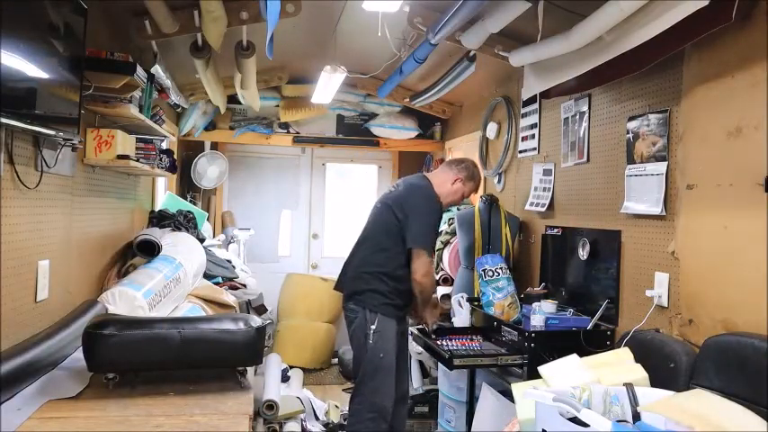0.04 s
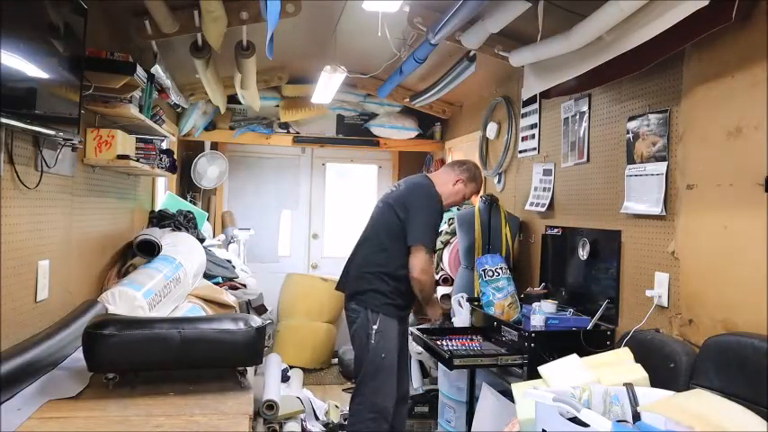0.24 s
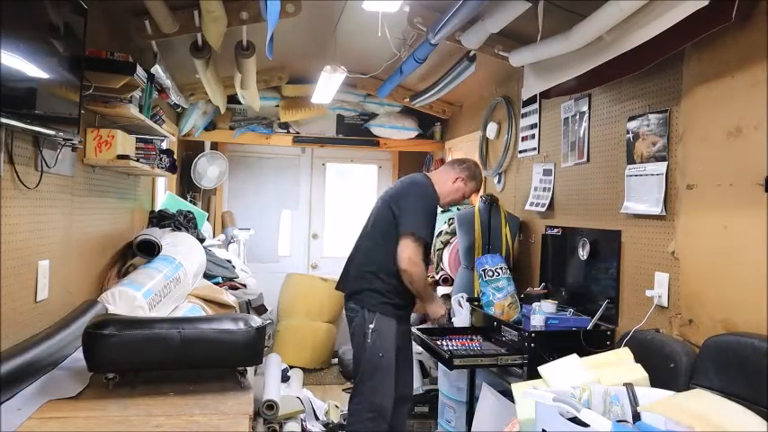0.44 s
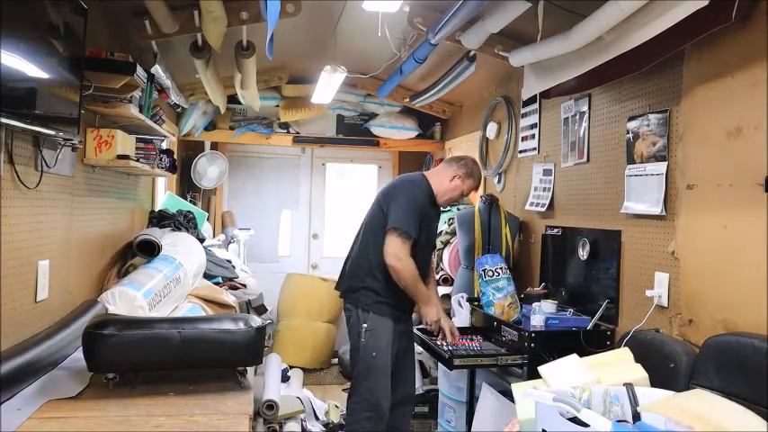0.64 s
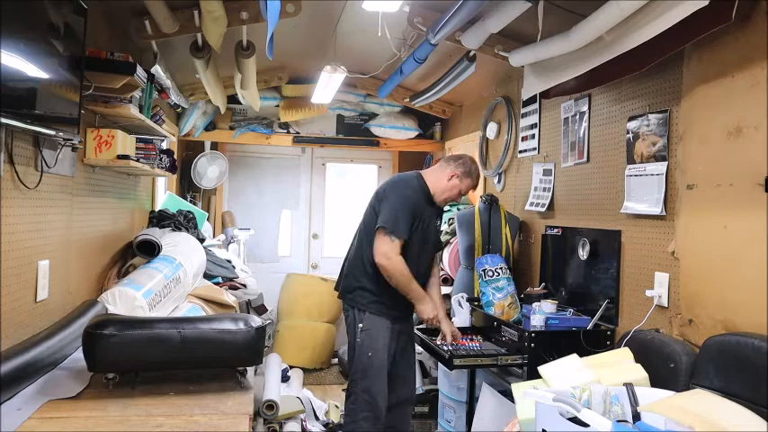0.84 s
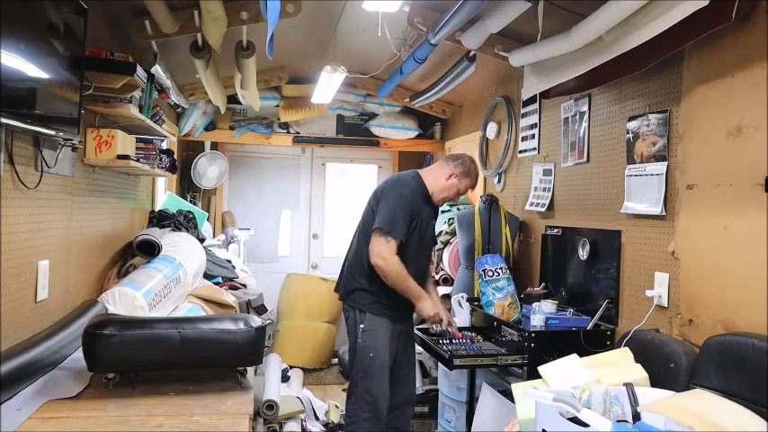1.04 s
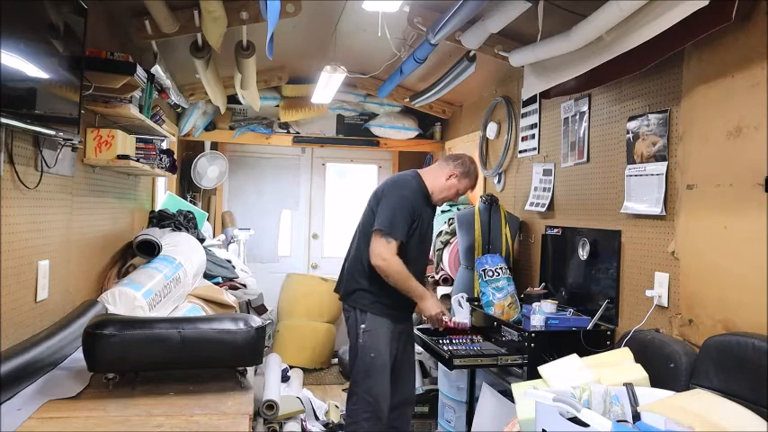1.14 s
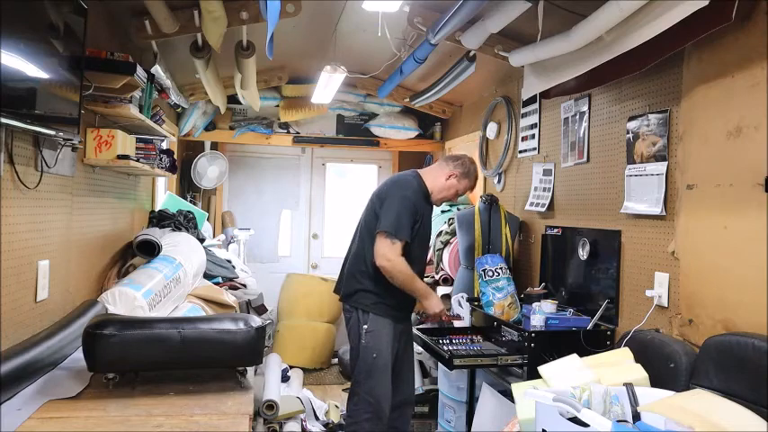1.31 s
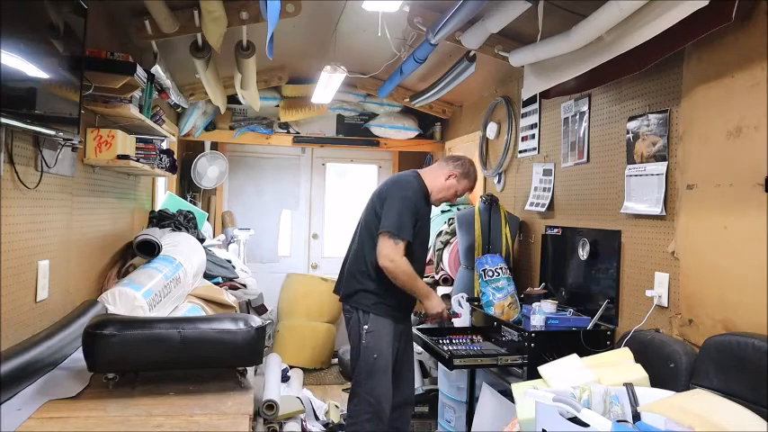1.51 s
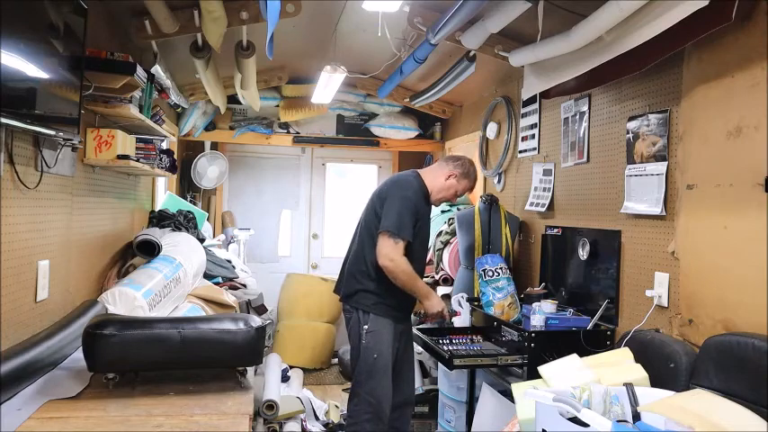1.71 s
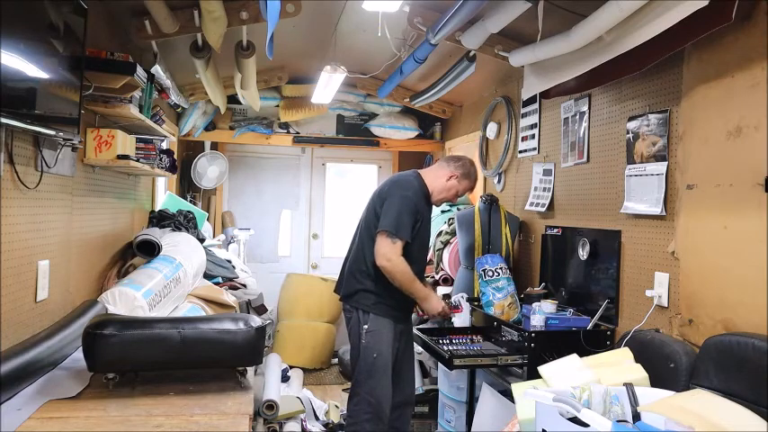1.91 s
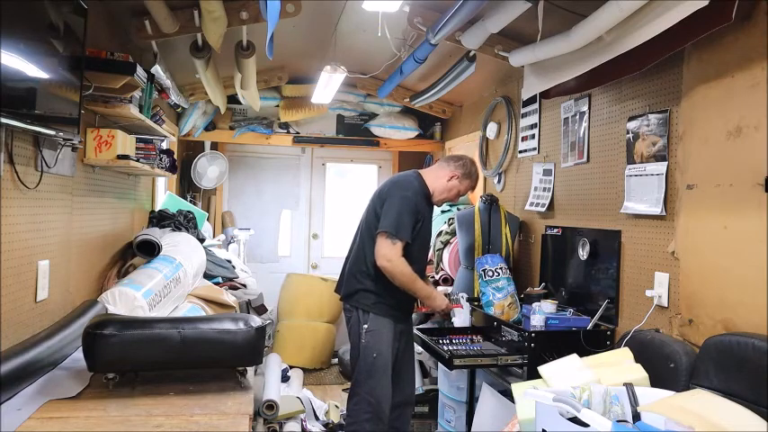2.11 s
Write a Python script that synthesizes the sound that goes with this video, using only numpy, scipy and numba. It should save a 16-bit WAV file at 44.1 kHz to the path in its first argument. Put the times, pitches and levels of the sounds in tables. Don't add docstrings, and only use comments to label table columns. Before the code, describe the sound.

A heavy metal tool crashes into a steel drawer, then small tools click and clink

```python
import sys
import numpy as np
from scipy import signal
from scipy.fft import rfft, irfft
from scipy.io import wavfile
from scipy.ndimage import uniform_filter1d
from numba import njit

SR = 44100
rng = np.random.default_rng(int(sys.argv[2]) if len(sys.argv) > 2 else 0)


def to_linear_factor(level_db):
    exponent = np.asarray(level_db, float) / 20
    return 10 ** exponent


def wav_out(sig):
    wavfile.write(sys.argv[1], SR, np.round(np.clip(np.atleast_2d(sig).T, -1, 1) * 32767).astype(np.int16))


N = 94815

# pitch_hz, level_db (per Hz)
FLOOR_COLOUR = [(12, -51), (20, -4), (120, -6), (319, -14), (698, -14.5), (1120, -20), (2750, -25),
                (13500, -31.5), (16000, -34)]
# start_s, level_db (peak), pitch_hz
SOFT_THUDS = [(0.174, -37, 94), (0.302, -34, 59), (.34, -34, 35), (.4, -39, 40), (.46, -39, 45.5),
              (0.52, -45, 120), (.548, -46, 132), (.559, -39, 123), (.571, -39, 131), (.591, -39, 74.4),
              (.611, -38, 70.5), (.826, -39, 118), (.858, -36, 96), (1.216, -39, 120), (1.314, -41.5, 112),
              (1.346, -41.5, 57.7), (1.479, -37.5, 90), (1.701, -38, 84.6), (1.714, -36.5, 130),
              (1.729, -42, 140), (1.834, -41.5, 78), (1.896, -35.5, 111)]
# start_s, level_db (peak), brightness_db (per octave)
DRAWER_BLOWS = [(.178, -45, 5.5), (0.2105, -11, 3.1), (.2115, -3, 3), (.2145, -7, 2.5), (.219, -10.5, 0),
                (.226, -5.5, 2.3), (.244, -7.5, 0.5), (0.263, -10.5, 9.5), (0.27, -13, 3.5),
                (.289, -13, 2.5), (.296, -4.5, 0), (.3095, -0.5, 4.4), (0.314, -3, 1.5), (.323, -3.5, 2.5),
                (0.328, -12.5, -3.5), (.345, -7, 2.3), (.354, -10, 4), (0.687, -42, 0), (.695, -41, 1.5)]
# pitch_hz, level_db (per Hz)
DRAWER_COLOUR = [(60, -35.5), (200, -11), (420, 0), (1100, 3), (2770, -4.5), (8800, -25.5), (11000, -40.5),
                 (16000, -56)]
# start_s, pitch_hz, level_db, fade_s (time to fall 60 dB)
SHEET_RINGS = [(.211, 425.5, -14.5, .06), (.213, 203, -29, 0.086), (.219, 1102, -25.5, 0.13),
               (.222, 701, -25, 0.072), (.263, 6240, -21.5, 0.023), (0.261, 8220, -29.5, .06),
               (.275, 149, -28.5, 0.084), (0.293, 2456, -18.5, 0.05), (.310, 773, -16, 0.045),
               (0.313, 1150, -22, .12), (.33, 960, -24, .2), (0.312, 1440, -19.5, 0.036),
               (.316, 371, -21.5, 0.052), (.318, 520, -19, 0.027), (0.319, 2753, -17, 0.032),
               (0.689, 1110, -40, 0.019)]
# start_s, level_db (peak), brightness_db (per octave)
TOOL_CLICKS = [(1.018, -42.5, -1), (1.038, -43, 5.5), (1.2, -40, -5), (1.204, -43.5, -2.1),
               (1.2547, -26, -5), (1.2568, -18.5, 1.7), (1.2644, -24.5, -2.2), (1.282, -42, 4),
               (1.3818, -21, -0.5), (1.3847, -24, -0.8), (1.395, -47, 6), (1.4204, -22.5, 4.7),
               (1.4248, -20.5, 0.5), (1.445, -25.5, 1), (1.4873, -31, -9.5), (1.4911, -20.5, -4),
               (1.4963, -14.5, 0), (1.510, -17, 1), (1.516, -29, -3), (1.532, -42, 13), (1.784, -27, 9.5),
               (1.7872, -31, 3.1), (1.807, -42, 5), (1.944, -28, 0), (1.949, -35, 6.5), (2.002, -44.5, -1)]
# pitch_hz, level_db (per Hz)
TOOL_COLOUR = [(300, -46.5), (1500, -18.5), (3000, -9), (6000, -0.5), (8800, -9.5), (10500, -29),
               (12500, -31), (16000, -48)]
# start_s, pitch_hz, level_db, fade_s (time to fall 60 dB)
TOOL_RINGS = [(1.255, 11550, -47, 0.11), (1.256, 13500, -48, .06), (1.257, 14900, -49, .09),
              (1.256, 6020, -37.5, 0.038), (1.282, 11700, -53, 0.068), (1.384, 14700, -48, 0.081),
              (1.384, 13500, -48, 0.034), (1.384, 11400, -48, 0.062), (1.428, 11800, -53, 0.065),
              (1.428, 14700, -56, .08), (1.496, 11900, -51, .05), (1.496, 13500, -48, .06),
              (1.511, 11500, -45, .07), (1.511, 13700, -46, .06), (1.787, 9000, -37, .01),
              (1.785, 5870, -55, 0.028), (1.946, 3720, -50, .02), (1.948, 7070, -50, .02)]
# start_s, length_s, pitch_hz, level_db
TINY_CREAK = (2.095, .035, 2850, -57)
# pitch_hz, fade_s (time to fall 60 dB)
ECHO_FADE = [(100, 0.48), (400, 0.31), (900, 0.24), (2000, 0.13), (6000, .22), (12000, 0.11)]
NEAR_DELAYS = (.0007, .0019)


def at_log(hz, table):
    table = np.array(table, float)
    return np.interp(np.log(np.maximum(hz, 1)), np.log(table[:, 0]), table[:, 1])


def colour(x, table, tilt_db=0):
    hz = np.arange(2049) * SR / 4096
    tilt = tilt_db * np.log2(np.maximum(hz, 50) / 1000)
    log_gain = (at_log(hz, table) + tilt) * np.log(10) / 20
    ceps = irfft(log_gain)
    ceps[1:2048] *= 2
    ceps[2049:] = 0
    response = irfft(np.exp(rfft(ceps)))
    return signal.fftconvolve(x, response)[:len(x)]


def add(out, start_s, x):
    i = int(start_s * SR)
    out[i:i + len(x)] += x[:N - i]


def walk(rate_hz):
    k = int(SR / rate_hz)
    steps = np.repeat(rng.standard_normal(N // k + 1), k)
    return 1.36 * uniform_filter1d(uniform_filter1d(steps, k), k)[:N]


def floor():
    noise = colour(rng.standard_normal(N), FLOOR_COLOUR)
    hum = signal.sosfilt(signal.butter(2, 200, fs=SR, output="sos"), noise)
    hiss = noise - hum
    x = hiss * to_linear_factor(0.37 * walk(2.22)) + hum * to_linear_factor(2.5 * walk(13))
    return to_linear_factor(-50.5) * x / np.std(x)


def thuds():
    out = np.zeros(N)
    cycles = 1.25
    for start_s, level_db, pitch_hz in SOFT_THUDS:
        turns = np.arange(int(cycles / pitch_hz * SR)) / SR * pitch_hz
        swing = np.sin(2 * np.pi * turns) * np.sin(np.pi * turns / cycles)
        add(out, start_s, -to_linear_factor(level_db) * swing)
    return out


def strike(crack_s, rattle_s, rattle_db):
    t = np.arange(SR // 8) / SR
    noise = rng.standard_normal(len(t))
    force = rng.exponential(size=len(t))
    crack = 0.16 * np.exp(-t / crack_s)
    rattle = to_linear_factor(rattle_db + 4.12 * force - 15.5) * np.exp(-t / rattle_s)
    push = noise * (crack + rattle)
    push[0] = 1
    return push


def hits(table, tone, gain_db, early_s, crack_s, rattle_s, rattle_db):
    out = np.zeros(N)
    for start_s, level_db, brightness_db in table:
        hit = colour(strike(crack_s, rattle_s, rattle_db), tone, brightness_db)
        hit = hit / np.max(np.abs(hit))
        add(out, start_s - early_s, to_linear_factor(level_db + gain_db) * hit)
    return out


def drawer():
    return hits(DRAWER_BLOWS, DRAWER_COLOUR, gain_db=-1.5, early_s=0,
                crack_s=0.00064, rattle_s=0.0079, rattle_db=-9)


def ring(table):
    out, t = np.zeros(N), np.arange(SR // 4) / SR
    for start_s, pitch_hz, level_db, fade_s in table:
        partner_hz = pitch_hz * (1 + 0.012 * rng.uniform(-1, 1))
        pair = np.sin(2 * np.pi * pitch_hz * t) + to_linear_factor(-4) * np.sin(2 * np.pi * partner_hz * t)
        flutter = np.interp(t / 0.003, np.arange(100), rng.standard_normal(100))
        buzz = to_linear_factor(5 * min(pitch_hz / 3000, 1) * flutter)
        fade = np.exp(-np.log(1000) * t / fade_s)
        onset = 1 - np.exp(-t / 0.0003)
        add(out, start_s, to_linear_factor(level_db - 2) * pair * buzz * fade * onset)
    return out


def sheet_ring():
    return ring(SHEET_RINGS)


def room(x):
    t = np.arange(SR // 2) / SR
    tail = np.zeros(len(t))
    for hz in 70 * 2 ** np.arange(0, 8, .5):
        b, a = signal.iirpeak(hz, 2, fs=SR)
        noise = signal.lfilter(b, a, rng.standard_normal(len(t)))
        tail += noise * np.exp(-np.log(1000) * t / at_log(hz, ECHO_FADE))
    tail = tail * (1 - np.exp(-t / 0.0019))
    near = np.zeros(2048)
    near[0] = 1
    for delay_s in NEAR_DELAYS:
        taps = np.r_[1, np.zeros(int(delay_s * SR) - 1), 0.72]
        near = signal.lfilter(taps[::-1], taps, near)
    echo = to_linear_factor(2.5) * tail / np.sqrt(np.sum(tail ** 2))
    echo[:len(near)] += to_linear_factor(3.5) * near
    return signal.fftconvolve(x, echo)[:N]


def tools():
    return hits(TOOL_CLICKS, TOOL_COLOUR, gain_db=0, early_s=0.0003,
                crack_s=0.00027, rattle_s=0.0032, rattle_db=-13)


def tool_ring():
    return ring(TOOL_RINGS)


def creak():
    start_s, length_s, pitch_hz, level_db = TINY_CREAK
    out, t = np.zeros(N), np.arange(int(length_s * SR)) / SR
    add(out, start_s, to_linear_factor(level_db) * np.sin(2 * np.pi * pitch_hz * t) * np.sin(np.pi * t / length_s))
    return out


def scene():
    metal = drawer() + sheet_ring() + tools() + tool_ring()
    return (floor() + thuds() + room(metal) + creak())[None]


@njit
def follow(x, release):
    e, out = 0., np.empty(len(x))
    for i in range(len(x)):
        e = max(abs(x[i]), e * release)
        out[i] = e
    return out


def low_pass(x):
    return signal.sosfilt(signal.butter(12, 16300, fs=SR, output="sos"), x)


def record(dry):
    release_s, threshold_db, ratio, clip = 0.36, -32.5, 1.0576, 0.94
    loudness = follow(dry[0], np.exp(-1 / (release_s * SR)))
    over = np.maximum(loudness / to_linear_factor(threshold_db), 1)
    gain = uniform_filter1d(over ** (1 / ratio - 1), 200)
    x = np.clip(dry * gain * to_linear_factor(1.5), -clip, clip)
    x = signal.sosfilt(signal.ellip(12, .2, 70, 15720, fs=SR, output="sos"), x)
    return low_pass(x)


dry = scene()
out = record(dry)
wav_out(out)
```